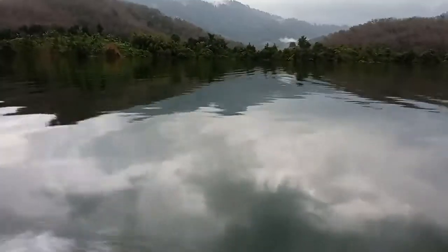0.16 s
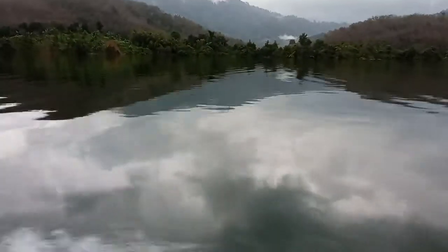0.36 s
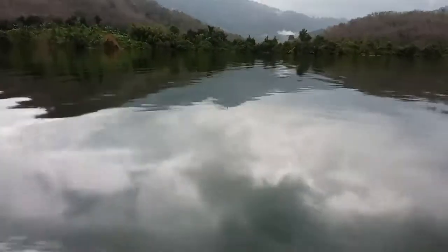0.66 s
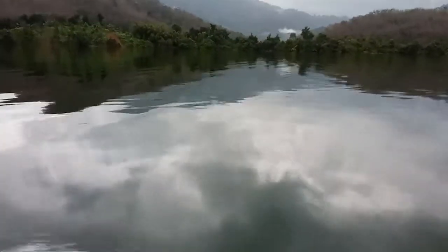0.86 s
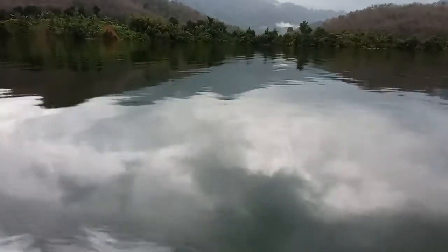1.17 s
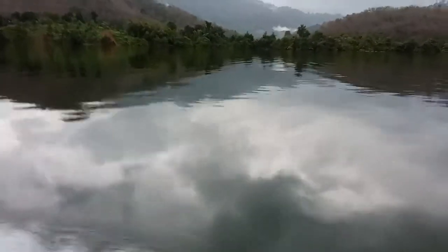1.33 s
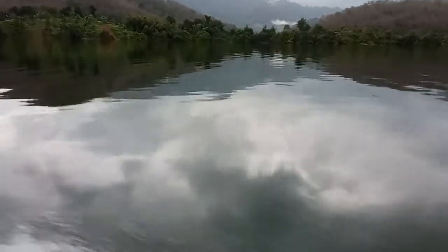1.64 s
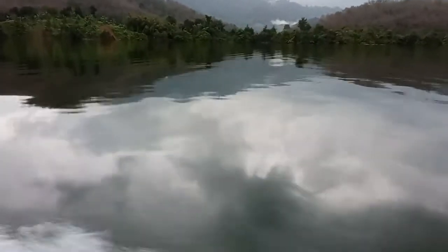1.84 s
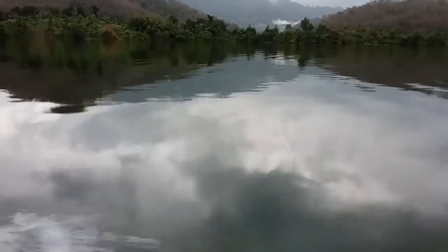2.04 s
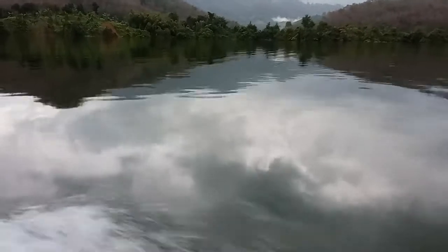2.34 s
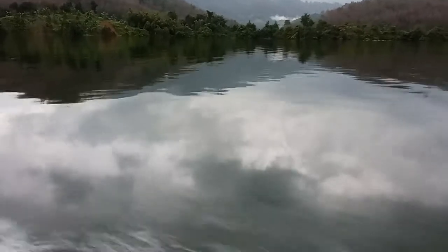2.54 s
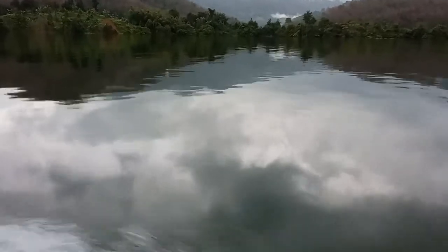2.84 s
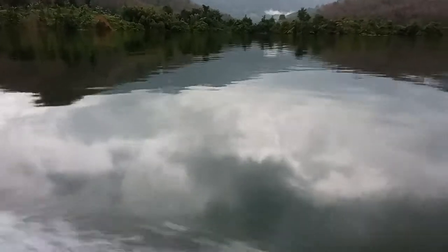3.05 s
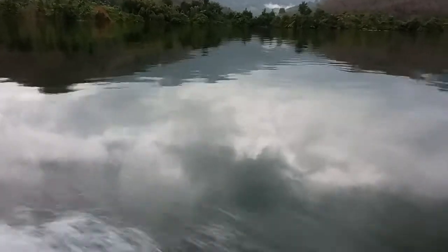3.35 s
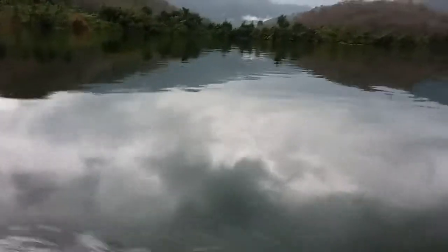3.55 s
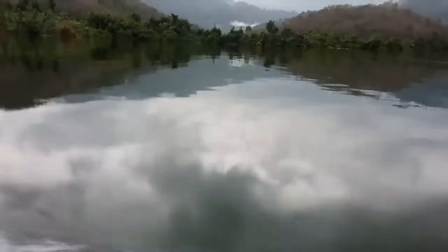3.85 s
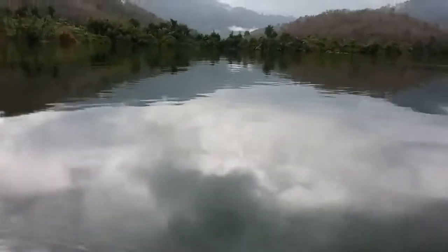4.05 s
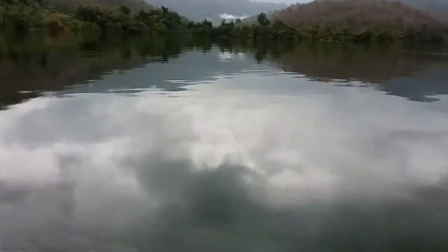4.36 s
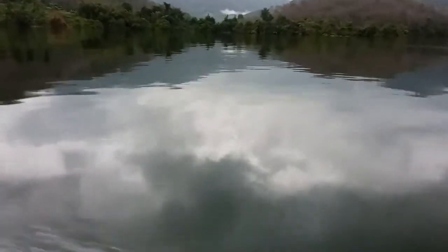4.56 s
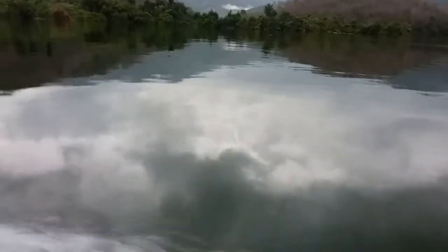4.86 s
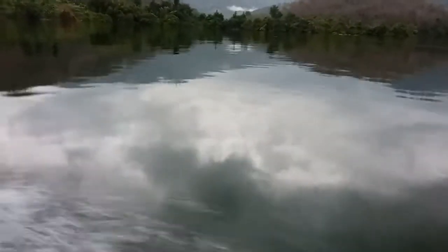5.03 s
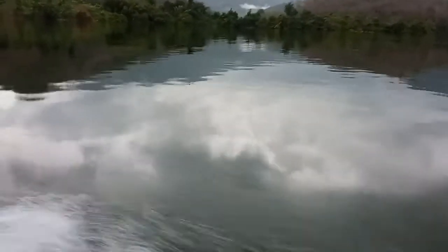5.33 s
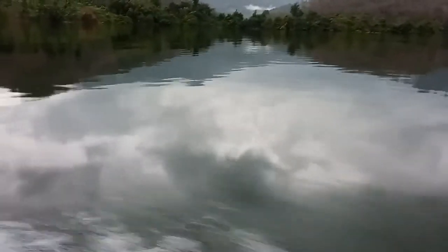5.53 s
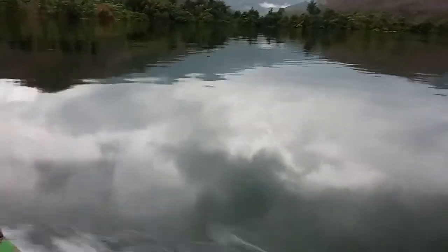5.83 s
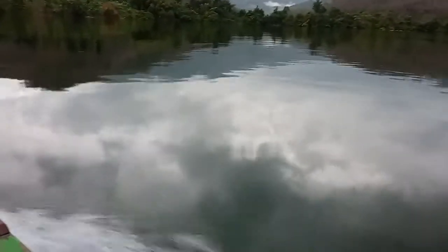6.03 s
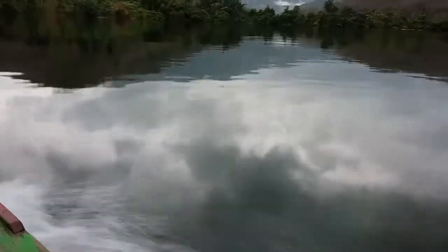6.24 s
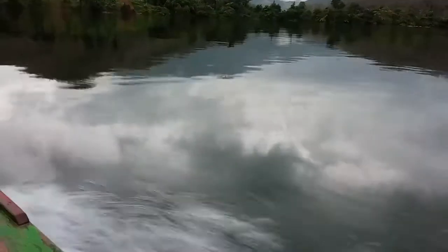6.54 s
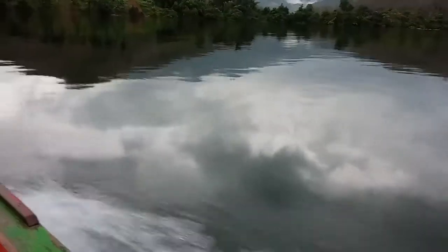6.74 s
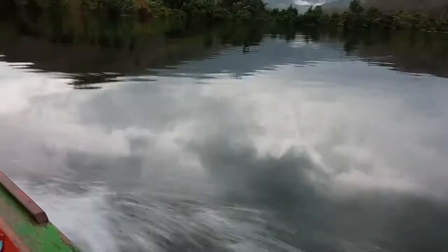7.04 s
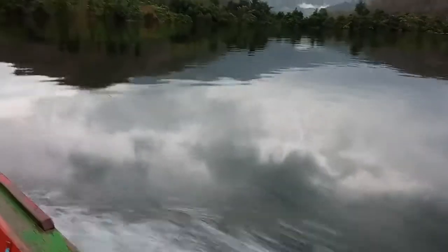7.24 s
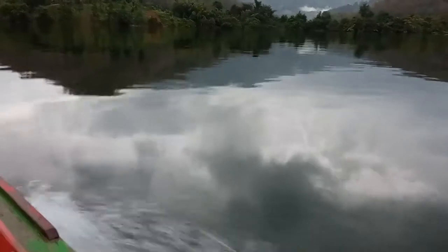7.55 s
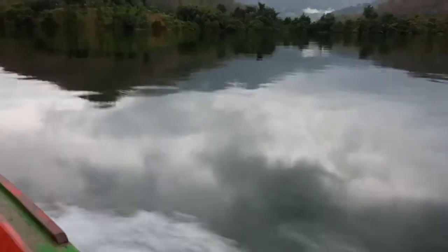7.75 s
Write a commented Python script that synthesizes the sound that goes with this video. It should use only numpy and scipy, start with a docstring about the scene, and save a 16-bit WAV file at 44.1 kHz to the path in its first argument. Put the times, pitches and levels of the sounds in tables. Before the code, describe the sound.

From 0 to about 7.9 seconds a small boat's single-cylinder diesel runs at steady throttle, already going at the start and still going at the end. It fires roughly 23 times a second, a rapid chug with barely wavering speed. Each beat joins a dry metallic knock, a low thud and a short rasp of gas; some knocks hit harder, as near 0.5, 1.1, 3.7, 4.0, 5.3 and 6.3 seconds, and they soften around 1.5 and 7.4. The hull rumbles low underneath. Water churns dully along the planks and the bow wave hisses with fine crackle and tiny rising bubbles. Spray swells gently and often, longer around 2.2-2.8, 5.3-5.8 and 6.5-6.9 seconds, with a brief misty lift near 4.7. Tiny bright splashes tick at 2.6 and 5.0. Close on-board perspective, open air, no echo.

```python
"""A single-cylinder diesel chugs at steady throttle and drives a small boat across a calm lake.
Each firing is a sharp knock (ringing metal modes), a low thud (pulses through resonances)
and a short rush of gas (a burst of noise). Under the chugging the hull rumbles as filtered noise.
The bow wave hisses and churns as filtered noise, crackles with random drops and bubbles in short rising notes."""
import sys
import numpy as np
from scipy import signal
from scipy.fft import rfft, irfft
from scipy.io import wavfile

SR = 44100
rng = np.random.default_rng(int(sys.argv[2]) if len(sys.argv) > 2 else 0)


def dump_mix(stems):
    """Bounce the given channels to the path in sys.argv[1] as a 16-bit WAV at rate SR."""
    frames = np.atleast_2d(stems).T  # one column per channel
    limited = np.clip(frames, -1, 1)  # hard clip at full scale
    pcm = np.round(limited * 32767).astype(np.int16)
    wavfile.write(sys.argv[1], SR, pcm)


N = 347949
TIME = np.arange(N) / SR  # seconds

FIRST_FIRING_S = 0.028
EXHAUST_LEAD_S, INTAKE_LAG_CYCLES = 0.0019, 0.43  # thud before the firing, intake gulp after it
SURGE_ATTACK_S, SURGE_RELEASE_S = 0.06, 0.12
SPRAY_BASE_DB, MIST_BASE_DB = -46, -48.5  # the steady bow wave between surges, before its layer trims
CHURN_FOLLOWS_SPRAY = 0.33  # dB of churning per dB of spray
TREBLE_EDGE_HZ = 15800

# The governor hunts a little around one speed. Each row: time in seconds, firings per second.
FIRING_RATE = [(0, 23.38), (.91, 23.533), (1.37, 23.15), (1.48, 23.57), (1.92, 23.455), (2.03, 23.1),
               (2.4, 23.394), (2.91, 23.272), (3.39, 23.952), (3.51, 23.2), (4.56, 23.319), (4.81, 23.608),
               (5.11, 23.193), (5.44, 23.509), (5.74, 23.24), (7.89, 23.263)]
# How strong the exhaust thuds are. Each row: time in seconds, relative level in dB.
THUD_LEVEL = [(0, -19.5), (1.15, -19.5), (1.42, -22), (2.0, -19.5), (2.5, -19), (3.03, -20.5), (3.32, -18),
              (3.55, -20), (4.5, -19), (4.72, -18), (4.9, -20.5), (5.35, -20), (5.62, -18), (5.95, -20),
              (6.75, -17.5), (7.45, -19), (7.89, -18.5)]
# How strong the combustion knock is. Each row: time in seconds, level in dB before the layer trim.
KNOCK_LEVEL = [(0, -30.5), (1.0, -30.5), (1.3, -26), (1.55, -35.5), (1.95, -28), (3.45, -30.5),
               (4.05, -26.5), (4.4, -29.3), (5.1, -28.5), (6.0, -32.5), (7.4, -36.5), (7.89, -31)]
# Cycles whose knock strength is set by hand, most of them hard.
# Each row: time in seconds, dB added to the knock level.
KNOCK_ACCENTS = [(0.37, 1.5), (0.5, 7), (1.01, -1), (1.14, 4.5), (1.31, 2), (1.44, 3.5), (2.46, 3),
                 (2.98, 4), (3.23, 4), (3.36, 0), (3.74, 5), (4.04, 5.5), (4.09, 4.5), (4.43, 1.5),
                 (4.52, 2), (4.99, 4), (5.33, 5), (6.27, 4.5)]
# Ringing of the cylinder block.
# Each row: average pitch in Hz, average relative level in dB, time to fade by 60 dB in seconds.
BLOCK_MODES = [(1710, -7, 0.0067), (2070, -6, 0.0036), (2212, -8.5, 0.025), (2380, 0, 0.0042),
               (2714, -6.5, 0.0096), (3210, -1.5, 0.0061), (3520, -0.5, 0.0024), (5700, -15.5, 0.0044),
               (7650, -19.5, 0.013)]
# Resonances of silencer and open hull, rung by each exhaust pulse.
# Each row: centre in Hz, width of one filter stage in Hz, relative level in dB, polarity as a sign.
EXHAUST_RESONANCES = [(83, 30, -21.5, -1), (108, 30, -8.9, -1), (162, 58, -3.3, 1), (244, 63, -12.5, -1),
                      (358, 51, -24, -1), (454, 162, -30.7, -1)]
# Resonances of the air intake, rung by each gulp of air.
# Each row: centre in Hz, width of one filter stage in Hz, relative level in dB, polarity as a sign.
INTAKE_RESONANCES = [(142, 30, -13.7, 1), (203, 66, -15, -1), (242, 30, -12.5, -1), (312, 35, -17, 1)]
# Colour of the gas rushing from the pipe. Each row: frequency in Hz, relative level in dB per Hz.
GAS_SPECTRUM = [(150, -15), (450, 1.5), (800, 3.5), (1200, -4), (2300, 5), (3300, 1), (4400, -4),
                (5800, -0.5), (7600, -6.5), (9600, -7), (11500, -16.5), (13500, -22), (15000, -21)]
# Colour of the hull and machinery rumble. Each row: frequency in Hz, relative level in dB per Hz.
RUMBLE_SPECTRUM = [(15, -46), (40, -7), (75, -6.5), (150, 3.5), (250, -2.5), (380, -7.5), (600, -21.5),
                   (1200, -36.5)]
# Colour of water churning against the planks. Each row: frequency in Hz, relative level in dB per Hz.
CHURN_SPECTRUM = [(150, -8.5), (450, 3), (560, 4), (680, -1), (850, 0.5), (1200, -7), (1600, -5.5),
                  (2200, -6.5), (4000, -27.5), (9000, -33)]
# How strong the churning along the side is. Each row: time in seconds, level in dB before surges and trim.
CHURN_LEVEL = [(0, -39.5), (1.3, -43.5), (1.9, -40.5), (2.9, -42.5), (4.3, -39.5), (5.2, -42), (6.6, -38),
               (7.5, -39), (7.89, -39)]
# Colour of the bow wave. Each row: frequency in Hz, relative level in dB per Hz.
WASH_SPECTRUM = [(300, -19.5), (900, -8.5), (1350, -7), (1900, -1.5), (2400, -0.5), (3100, -4.5),
                 (4300, -7.5), (5700, -3.5), (6600, -3), (8000, -10), (9700, -1), (11500, -15),
                 (13800, -31), (14800, -6.5)]
# The bow throws up surges of spray.
# Each row: start in seconds, time from start to release in seconds, change of spray in dB,
# change of fine mist in dB.
SPRAY_SURGES = [(0.087, 0.25, 1.5, 3), (.52, 0.3, 2, 4), (0.874, .36, 1.5, 2.5), (1.76, 0.28, 2.5, 3.5),
                (2.207, .6, 2.5, 3), (3.24, 0.14, 2.5, 2.5), (3.716, 0.067, 1.5, 4), (3.913, .24, 2, 3.5),
                (4.37, 0.26, 1.5, 3), (4.73, 0.073, 2, 7.5), (4.96, 0.12, 1.5, 4), (5.268, 0.51, 2.5, 1.5),
                (6.06, .19, 1, 2), (6.515, 0.41, 2.5, 1.5), (7.133, .33, 2, 0.5), (7.71, .2, 2.5, -1)]
# Splashes that stand out. Each row: start in seconds, level in dB before the treble filter.
SPLASH_EVENTS = [(2.557, -29), (4.998, -24)]


def gain_of(db):
    """Turns decibels into amplitude."""
    return 10 ** (np.asarray(db) / 20)


def evened(x):
    """Scales a sound to an average strength (rms) of 1."""
    return x / np.sqrt(np.mean(x ** 2) + 1e-20)


def noise():
    """White noise: a fresh random value for every sample."""
    return rng.standard_normal(N)


def read(spectrum, hz):
    """Reads a spectrum table along a logarithmic frequency axis."""
    table_hz, db = np.transpose(spectrum)
    return np.interp(np.log(hz + 1), np.log(table_hz + 1), db)


def add(mix, start_s, sound):
    """Lays a sound into the mix at its start time."""
    part = mix[max(round(start_s * SR), 0):][:len(sound)]
    part += sound[:len(part)]


def coloured(x, spectrum, size=16384):
    """Filters to the given spectrum; the filter rings after a blow, never before."""
    hz = abs(np.fft.fftfreq(size, 1 / SR))
    log_gain = np.log(gain_of(read(spectrum, hz)))
    # minimum phase: the phase follows from the log gain
    response = np.exp(np.conj(signal.hilbert(log_gain)))
    ring = np.fft.ifft(response).real[:size // 4]
    return signal.oaconvolve(x, ring)[:N]


def drift(rate_hz):
    """Smooth random wandering of rms 1; a higher rate wanders faster."""
    coarse_time = TIME[::128]
    count = len(coarse_time)
    hz = np.fft.rfftfreq(count, coarse_time[1])
    smooth = irfft(rfft(rng.standard_normal(count)) / (1 + (hz / rate_hz) ** 4), count)
    return np.interp(TIME, coarse_time, evened(smooth))


def running(s):
    """Gives the firing rate, thud level and knock level at the times s."""
    return [np.interp(s, *np.transpose(curve)) for curve in (FIRING_RATE, THUD_LEVEL, KNOCK_LEVEL)]


def firings():
    """The cylinder fires each time the engine completes a cycle."""
    rate = running(TIME)[0]
    cycles = np.cumsum(rate) / SR
    cycles -= np.interp(FIRST_FIRING_S, TIME, cycles)
    return np.interp(np.arange(int(cycles[-1]) + 1), cycles, TIME)


def blows(times, db):
    """Places one impulse at each time."""
    train = np.zeros(N)
    positions = np.round(times * SR).astype(int)
    train[np.clip(positions, 0, N - 1)] = gain_of(db)
    return train


def puffs(train, rise_s, decay_s):
    """Turbulence gives a burst of noise after each impulse."""
    t = TIME[:SR // 20]
    shape = (1 - np.exp(-t / rise_s)) * np.exp(-t / decay_s)
    return signal.oaconvolve(train, shape)[:N] * noise()


def boom(train, modes, size=16384):
    """Passes pressure pulses through a set of steep resonances."""
    f = np.fft.rfftfreq(size, 1 / SR)
    response = 0
    for hz, width, db, polarity in modes:
        stage = f * width / (f * width + 1j * (f * f - hz * hz))
        response = response + polarity * gain_of(db) * stage ** 2  # two equal stages
    return signal.oaconvolve(train, irfft(response))[:N]


def water():
    """Levels of churn, spray and mist: each surge comes in, holds and returns to the steady bow wave."""
    spray_db, mist_db = np.zeros((2, N))
    for start, length, spray_change_db, mist_change_db in SPRAY_SURGES:
        age = TIME - start
        rise, fall = age / SURGE_ATTACK_S, 1 - (age - length) / SURGE_RELEASE_S
        swell = np.clip(np.minimum(rise, fall), 0, 1)
        spray_db += spray_change_db * swell
        mist_db += mist_change_db * swell
    churn_db = np.interp(TIME, *np.transpose(CHURN_LEVEL)) + CHURN_FOLLOWS_SPRAY * spray_db
    return churn_db, SPRAY_BASE_DB + spray_db, MIST_BASE_DB + mist_db


def hull(below_exhaust_db=-15, swell_db=0.5):
    """The planks rumble as low noise, louder when the engine pulls hard and the thuds grow."""
    level_db = running(TIME)[1] + below_exhaust_db + swell_db * drift(rate_hz=4.2)
    return gain_of(level_db) * evened(coloured(noise(), RUMBLE_SPECTRUM))


def churn(level_db=-2, flutter_db=1):
    """The hull shoulders water aside with a dull, uneven wash of noise."""
    churn_db = level_db + water()[0] + flutter_db * drift(rate_hz=8.3)
    return gain_of(churn_db) * evened(coloured(noise(), CHURN_SPECTRUM))


def bow_wave(spray_db=4, mist_db=0, flutter_db=1.36, sparkle_db=1.8, fizz_db=-4,
             drops_per_s=900, drop_spread_db=4.0, split_hz=7500, order=4):
    """A sheet of spray hisses; single droplets fall back as a fine crackle."""
    size_db = drop_spread_db * np.minimum(rng.exponential(1, N), 5)
    sizes = gain_of(size_db) * np.sign(noise())
    drops = evened(sizes * (rng.random(N) < drops_per_s / SR))
    hiss = coloured(noise() + gain_of(fizz_db) * drops, WASH_SPECTRUM)
    # the finest mist is the treble, which comes and goes on its own
    high_pass = signal.butter(order, split_hz, "high", fs=SR, output="sos")
    mist = signal.sosfiltfilt(high_pass, hiss)
    _, surge_spray_db, surge_mist_db = water()
    spray_gain = gain_of(spray_db + surge_spray_db + flutter_db * drift(rate_hz=20.4))
    mist_gain = gain_of(mist_db + surge_mist_db + sparkle_db * drift(rate_hz=26))
    return spray_gain * evened(hiss - mist) + mist_gain * evened(mist)


def bubbles(level_db=-49, low_hz=450, high_hz=4000, per_s=5, cycles=9, glide=0.0756, count=20):
    """Air folded under by the bow rings as short notes that rise in pitch while they fade."""
    out = np.zeros(N)
    for hz in np.geomspace(low_hz, high_hz, count):
        age = TIME[:SR // 12] * hz / cycles  # 1 = one decay time
        envelope = (1 - np.exp(-10 * age)) * np.exp(-age)
        note = envelope * np.sin(2 * np.pi * cycles * age * (1 + glide * age / 2))
        # per_s counts the bubbles of each pitch
        births = (rng.random(N) < per_s / SR) * rng.uniform(0.47, 1, N)
        out += signal.oaconvolve(births, note)[:N]
    return gain_of(level_db) * evened(out)


def exhaust(fired, level_db=-20.0, uneven_db=0.44, intake_uneven_db=1.1, turbulence_db=-26):
    """Exhaust pulses thud through resonances; just under half a cycle after firing the intake answers."""
    rate, force_db, _ = running(fired)
    chance = rng.standard_normal((len(fired), 2))
    pushes = blows(fired - EXHAUST_LEAD_S, force_db + uneven_db * chance[:, 0])
    gulps = blows(fired + INTAKE_LAG_CYCLES / rate, force_db + intake_uneven_db * chance[:, 1])
    clean = evened(boom(pushes, EXHAUST_RESONANCES) + boom(gulps, INTAKE_RESONANCES))
    turbulence = puffs(pushes, rise_s=0.00078, decay_s=0.0027)
    ragged = evened(boom(turbulence, EXHAUST_RESONANCES))
    return gain_of(level_db) * (clean + gain_of(turbulence_db) * ragged)


def gas(fired, level_db=-42.0, uneven_db=1, follows_knock=0.32):
    """Gas rasps briefly at each firing, stronger where the knock level curve is higher."""
    chance = np.minimum(rng.standard_normal(len(fired)), 1)
    # follows_knock: dB of gas per dB of knock
    train = blows(fired, follows_knock * running(fired)[2] + uneven_db * chance)
    rush = puffs(train, rise_s=0.00076, decay_s=0.0063)
    return gain_of(level_db) * evened(coloured(rush, GAS_SPECTRUM))


def knock(fired, level_db=-1.0, uneven_db=0.5, mixture_db=2.5, tilt_db=1.5, mode_spread=0.047,
          jitter_s=0.00013, rise_s=0.00053):
    """Ignition cracks against the block; each cycle shakes its modes in a different mixture."""
    extra_db = uneven_db * np.minimum(rng.standard_normal(len(fired)), 1)
    for s, accent_db in KNOCK_ACCENTS:
        extra_db[np.argmin(abs(fired - s))] = accent_db
    t, out = TIME[:SR // 50], np.zeros(N)
    hz, db, t60 = np.transpose(BLOCK_MODES)[:, :, None]
    octaves = np.minimum(np.log2(hz / hz[0]), 1)
    onset = 1 - np.exp(-(t / rise_s) ** 2)
    for s, force_db in zip(fired, running(fired)[2] + extra_db):
        share, detune, phase = rng.standard_normal((3, len(BLOCK_MODES), 1))
        # a steeper pressure rise favours the upper modes
        mode_db = db + mixture_db * share + tilt_db * rng.standard_normal() * octaves
        mode_hz = hz * (1 + mode_spread * detune)
        modes = gain_of(mode_db - 60 * t / t60) * np.sin(2 * np.pi * (mode_hz * t + phase))
        ring = modes.sum(0) * onset
        ring /= np.std(ring[:round(0.0036 * SR)])  # even out the first 3.6 ms
        add(out, s + jitter_s * rng.standard_normal(), gain_of(force_db + level_db) * ring)
    return out


def splashes(decay_s=0.0012, low_hz=8000):
    """A larger drop now and then lands close by: a fading noise burst with only its treble kept."""
    t, out = TIME[:SR // 100], np.zeros(N)
    bright = signal.butter(2, low_hz, "high", fs=SR, output="sos")
    for s, db in SPLASH_EVENTS:
        burst = np.exp(-t / decay_s) * rng.standard_normal(len(t))
        add(out, s, gain_of(db) * signal.sosfilt(bright, burst))
    return out


def scene():
    """Engine and water, heard from on board."""
    fired = firings()
    engine = hull() + exhaust(fired) + gas(fired) + knock(fired)
    lake = churn() + bow_wave() + bubbles() + splashes()
    return (engine + lake)[None]


def record(dry):
    """Cuts the treble above the edge with a steep low-pass filter."""
    low_pass = signal.firwin(511, TREBLE_EDGE_HZ, window=("kaiser", 9), fs=SR)
    return signal.oaconvolve(dry, low_pass[None], "same")


dry = scene()
out = record(dry)
dump_mix(out)
```